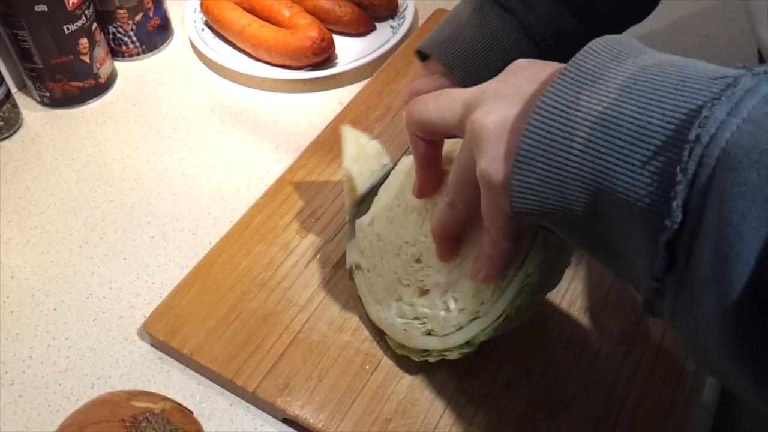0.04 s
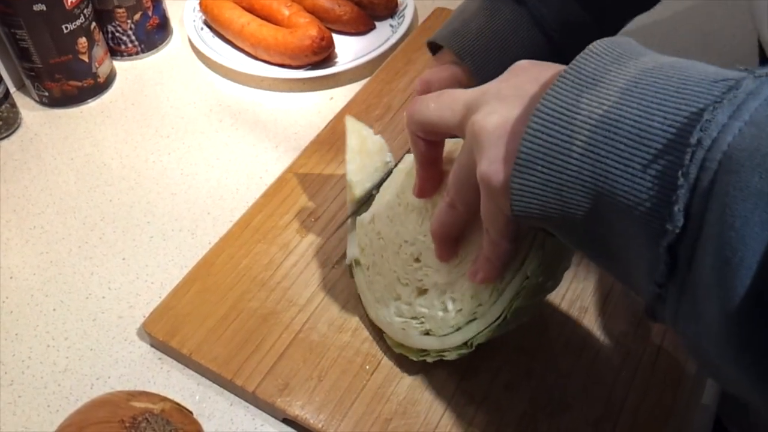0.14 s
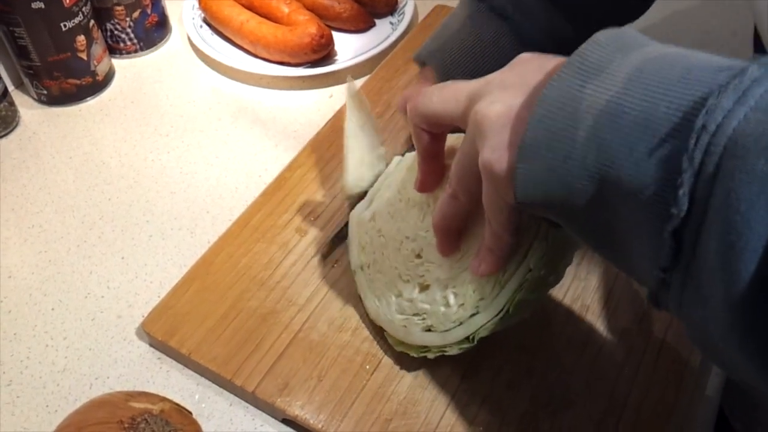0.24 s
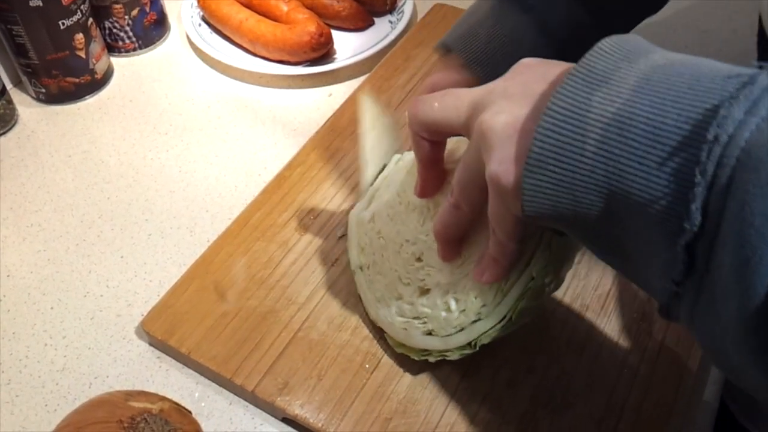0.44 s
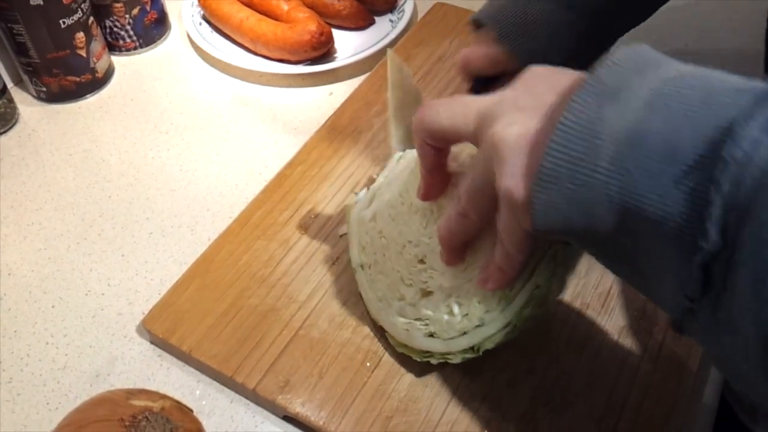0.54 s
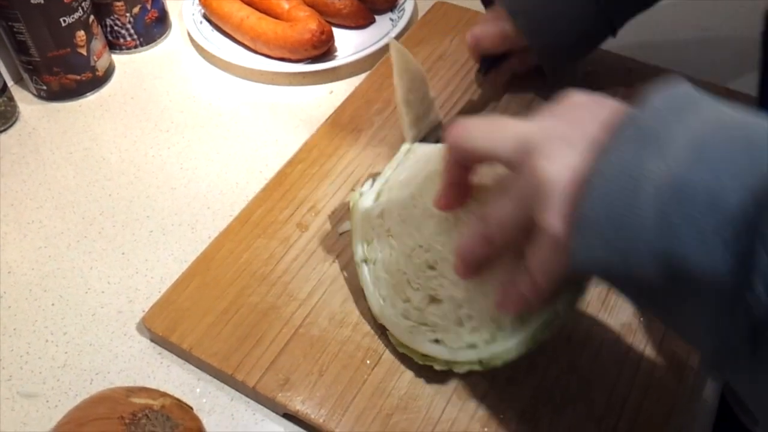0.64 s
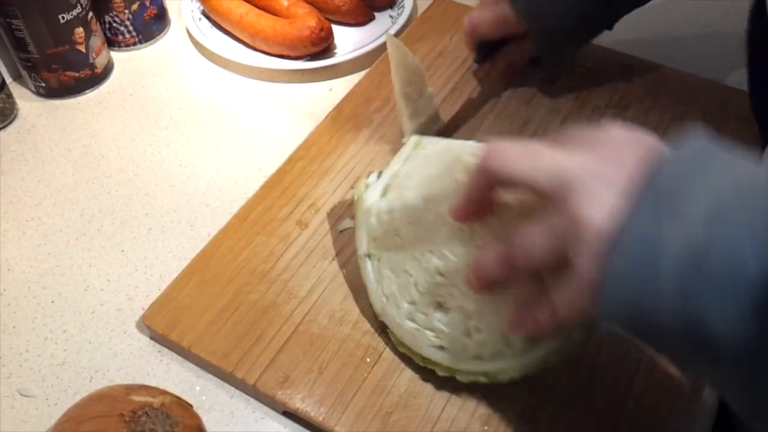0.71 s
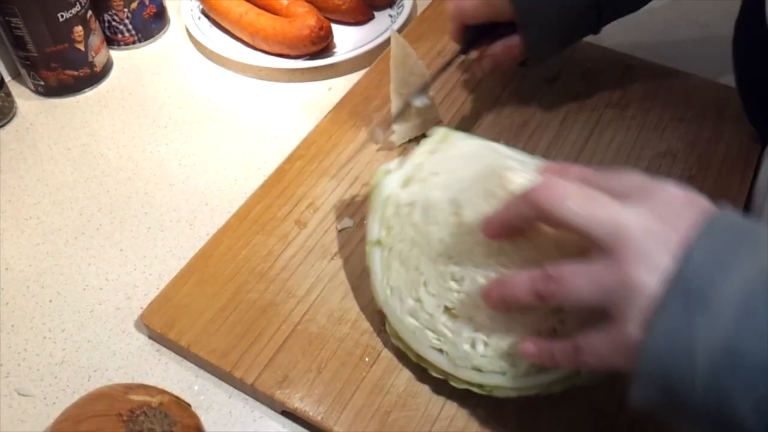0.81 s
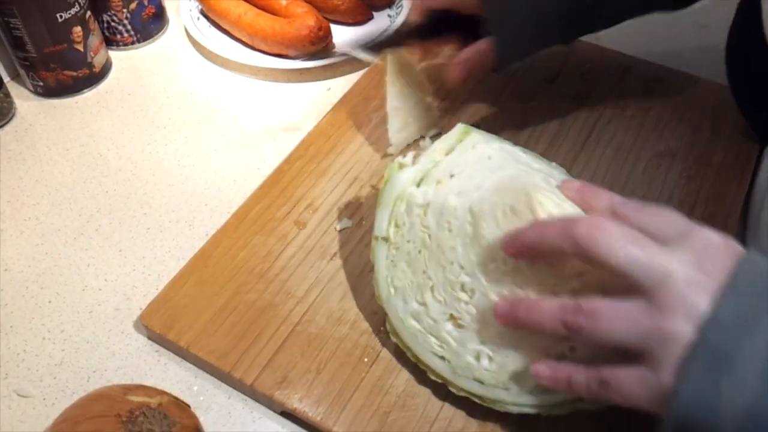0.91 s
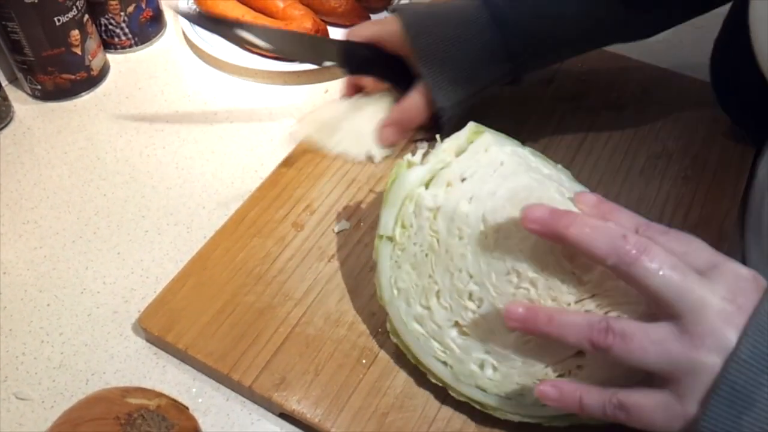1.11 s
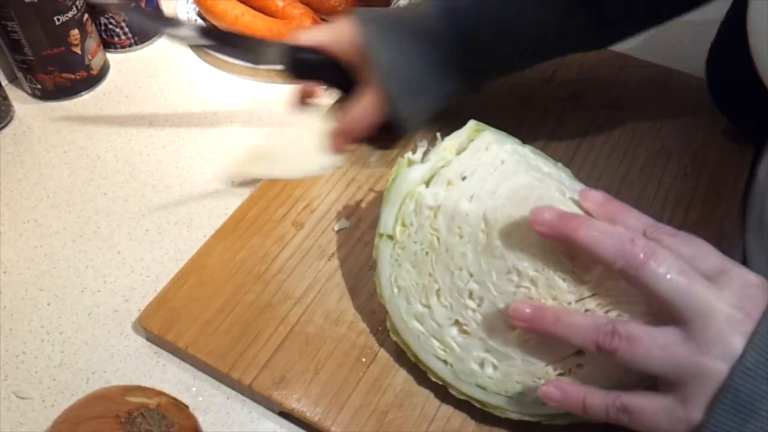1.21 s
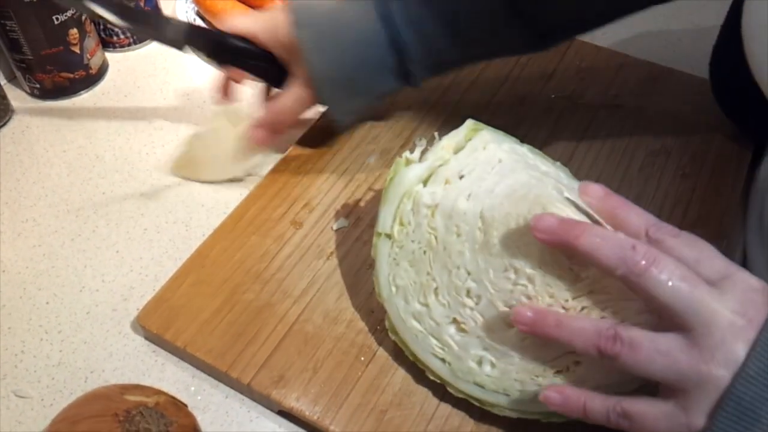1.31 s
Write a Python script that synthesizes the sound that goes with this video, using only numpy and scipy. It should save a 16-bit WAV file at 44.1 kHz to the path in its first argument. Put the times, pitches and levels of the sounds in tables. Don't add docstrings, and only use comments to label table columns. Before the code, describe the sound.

A knife chops hard through a crunchy raw cabbage core and hits a wooden board, close up.

```python
import sys
import numpy as np
from scipy import signal
from scipy.fft import rfft, irfft
from scipy.io import wavfile
from scipy.ndimage import map_coordinates

SR = 44100
rng = np.random.default_rng(int(sys.argv[2]) if len(sys.argv) > 2 else 0)


def pcm_store(signal):
    levels = np.round(np.clip(np.atleast_2d(signal), -1, 1) * 32767)
    wavfile.write(sys.argv[1], SR, levels.astype(np.int16).T)


def nominal_scale(level):
    x = np.asarray(level, float) / 20
    return 10 ** x


N = 59535


def rms_one(x):
    return x / np.sqrt(np.mean(x ** 2) + 1e-20)


def in_time(rows):
    s, db = np.transpose(rows)
    return np.interp(np.arange(N) / SR, s, db)


def colour(x, points, share=1):
    size = 2 ** 17
    hz, db = np.transpose(points)
    bins_hz = np.arange(size // 2 + 1) * SR / size
    gain_db = share * np.interp(np.log(bins_hz + 1), np.log(hz + 1), db)
    cepstrum = irfft(gain_db * np.log(10) / 20)
    cepstrum = np.concatenate([cepstrum[:1], 2 * cepstrum[1:size // 2]])
    return irfft(rfft(x, size) * np.exp(rfft(cepstrum, size)))[..., :N]


def drift(rate_hz):
    r = np.exp(-2 * np.pi * rate_hz / SR)
    return rms_one(signal.lfilter([1], [1, -2 * r, r * r], rng.standard_normal(N + SR))[SR:])


def ring(x, hz, t60):
    r, w = nominal_scale(-60 / (t60 * SR)), 2 * np.pi * hz / SR
    return signal.lfilter([0, np.sin(w)], [1, -2 * r * np.cos(w), r * r], x + 1e-18)


def pair(two, alike):
    alike = np.clip(alike, 0, 1)
    side = signal.sosfilt(signal.butter(1, 320, "high", fs=SR, output="sos"), two[1])
    shared = np.sqrt(1 + alike) * two[0]
    opposed = np.sqrt(1 - alike) * side * np.array([[1], [-1]])
    return (shared + opposed) / np.sqrt(2)


def grains(per_s, spread_db, spectrum, alike):
    sizes = nominal_scale(spread_db * np.minimum(rng.exponential(1, (2, N)), 5)) * rng.standard_normal((2, N))
    born = np.clip((per_s / SR - rng.random((2, N))) * 20, 0, 1)
    return rms_one(colour(pair(sizes * born, alike), spectrum))


def struck(blows, modes, scatter_db):
    out, own = np.zeros(N), rng.standard_normal((len(blows), len(modes)))
    for k, (hz, db, t60) in enumerate(modes):
        clicks = np.zeros(N)
        for j, (s, blow_db) in enumerate(blows):
            clicks[int(s * SR)] = nominal_scale(blow_db + db + scatter_db * own[j, k]) * (-1) ** k
        out += ring(clicks, hz, t60)
    return out


# frequency in Hz, density in dB per Hz.
AIR_COLOUR = [(30, -43.5), (158, 0.5), (500, -15), (655, -8.5), (1400, -22), (7500, -24), (13800, -32.5),
              (15000, -56)]
# frequency in Hz, level in dB, line width in Hz.
HUM_LINES = [(124.7, -60.5, 4.7), (175, -55, 16), (244.3, -58, 6.5), (308.3, -59, 23), (634, -60, 34),
             (761, -68, 24)]


def room_tone():
    out = nominal_scale(-48.5) * rms_one(colour(pair(rng.standard_normal((2, N)), alike=0.25), AIR_COLOUR))
    for hz, db, width_hz in HUM_LINES:
        line = ring(rng.standard_normal((2, N + SR)), hz, 4.1 / width_hz)[:, SR:]
        out = out + nominal_scale(db) * rms_one(pair(line, alike=1))
    return out


# time in seconds, level in dB.
RUB_LEVEL = [(0, -27.5), (.025, -34.5), (.06, -40), (.13, -43), (.19, -53.5), (.36, -42), (.43, -43),
             (.465, -36.5), (.5, -38), (.55, -33), (.6, -42.5), (.68, -45.5), (.84, -53.5), (.857, -36.5),
             (.895, -60), (.915, -39.5), (.97, -57), (1.35, -57)]
# frequency in Hz, density in dB per Hz.
RUB_COLOUR = [(300, -1), (900, 1), (2000, 1), (3700, 4.5), (5400, -1), (7500, 2), (13000, -12),
              (15000, -23)]


def rubbing():
    level_db = in_time(RUB_LEVEL) + 1.0 * drift(rate_hz=60)
    return nominal_scale(level_db) * grains(per_s=15000, spread_db=1.8, spectrum=RUB_COLOUR, alike=0.13)


SNAP_TIMES = [.0075, .016, .0682, .171, .464, .5188, .533, .547, .551, .568, .605, .689, .718, .762, .776,
              .8103, .8248, .8538, .858, .869, .877, .9028, .9103, .93, .943, .976, 1.03, 1.106, 1.247]
# peak in dB, pitch in Hz, length in seconds.
SNAPS = [(-24, 2800, 0.004), (-22, 3400, .005), (-19, 8000, .005), (-35, 3400, 0.0026), (-26, 5000, 0.0038),
         (-24, 3400, 0.00074), (-25, 2400, 0.0063), (-22, 2400, .002), (-23.5, 2000, 0.008),
         (-29.5, 2400, 0.0013), (-34, 9800, 0.0096), (-27.5, 4000, 0.0028), (-27, 4100, 0.0045),
         (-36, 5500, .002), (-34, 2200, 0.0029), (-24.5, 6800, 0.0016), (-19, 9600, 0.0025),
         (-27.5, 7400, 0.0052), (-27.5, 3300, 0.0044), (-37, 9500, 0.0016), (-39, 7200, .002),
         (-19.5, 4900, 0.00099), (-24, 5400, 0.0059), (-44, 5600, .002), (-49, 6000, 0.0018),
         (-33, 3400, 0.0027), (-39, 1660, 0.0092), (-26.5, 2740, 0.0037), (-31.5, 7500, 0.0078)]
# frequency in Hz, density in dB per Hz.
SNAP_COLOUR = [(500, -49), (1500, -8), (3750, -40), (5300, 7), (7500, 4), (14800, -13)]


def snaps():
    trim_db, broad_db, ring_cycles = -1, 6.5, 7
    broad, tuned, t = np.zeros(N + SR), np.zeros(N + SR), np.arange(1500) / SR
    noise = rng.standard_normal((len(SNAPS), len(t)))
    noise[:, 0] = 3
    for s, (db, hz, length_s), crackle in zip(SNAP_TIMES, SNAPS, noise):
        burst = crackle * np.exp(-t / (abs(length_s) / 2))
        tone = ring(burst, hz, ring_cycles / hz)
        i = int(s * SR)
        tuned[i:i + len(t)] += nominal_scale(db + trim_db) * tone / np.abs(tone).max()
        broad[i:i + len(t)] += nominal_scale(db + trim_db + broad_db) * burst / np.abs(burst).max()
    return tuned[:N] + colour(broad[:N], SNAP_COLOUR)


# time in seconds, level in dB.
TEAR_LEVEL = [
    (.2035, -33),
    (.2056, -40),
    (.2062, -16.5),
    (.217, -16.5),
    (.225, -16),
    (.232, -13),
    (.244, -20),
    (.256, -31.5),
    (.33, -59),
]
# frequency in Hz, density in dB per Hz.
TEAR_COLOUR = [(120, -28), (900, -2.5), (2000, 2.5), (3800, 1.5), (5300, 0.5), (7500, 3), (11000, -1.5),
               (14800, -8)]


def tearing():
    t = np.arange(N) / SR
    during = (t > TEAR_LEVEL[0][0]) * (t < TEAR_LEVEL[-1][0])
    cells = grains(per_s=14300, spread_db=2, spectrum=TEAR_COLOUR, alike=0.2)
    return nominal_scale(in_time(TEAR_LEVEL)) * during * cells


# time in seconds, level in dB.
LANDINGS = [
    (.2322, -6),
    (.2345, -11.5),
    (.2415, -14.5),
]
# frequency in Hz, level in dB, t60 in seconds.
BOARD_MODES = [(319, -15, 0.043), (510, -21.5, 0.1), (746, -14, 0.041), (920, -19, 0.045),
               (1090, -9.5, 0.017), (1460, -6.5, 0.017), (1586, -8, 0.035), (1877, -4.5, 0.086),
               (2040, -5, 0.013), (2793, -4, 0.04), (2920, -3.5, 0.013), (3810, 0.5, 0.012),
               (4470, -6, .01)]


def landing():
    return struck(LANDINGS, BOARD_MODES, scatter_db=2.5)


# frequency in Hz, density in dB per Hz.
SPLIT_COLOUR = [(100, -20), (300, -4.5), (900, -10), (1900, 5.5), (3000, -6.5), (5500, -20), (8000, -7),
                (14800, -27)]


def splitting():
    start_s, start_db, t60_s = .234, -16, 0.23
    t = np.arange(N) / SR
    level_db = start_db - 60 * np.abs(t - start_s) / t60_s
    cells = grains(per_s=7700, spread_db=2, spectrum=SPLIT_COLOUR, alike=0.2)
    return nominal_scale(level_db) * (t > start_s) * cells


# time in seconds, level in dB.
KNOCKS = [
    (1.1065, -27),
    (1.1145, -27),
    (1.141, -38),
    (1.162, -31),
    (1.19, -48.5),
]
# frequency in Hz, level in dB, t60 in seconds.
COUNTER_MODES = [(183, -12, .1), (280.3, -5, 0.25), (360, -8.5, 0.034), (420, -8, 0.14), (464, -6, 0.046),
                 (536.5, -13, 0.23), (596, -3, 0.033), (748.5, -13.5, 0.094), (828, -22, 0.045),
                 (980, -9.5, 0.027), (1420, -10, 0.016), (2330, -17, .015)]


def knocking():
    return struck(KNOCKS, COUNTER_MODES, scatter_db=4.5)


def kitchen(x):
    t60_s, wall_cut_hz = 0.35, 3800
    t = np.arange(SR // 2) / SR
    echoes = pair(rng.standard_normal((2, len(t))), alike=0) * nominal_scale(-60 * t / t60_s) * (t > .004)
    echoes = signal.sosfilt(signal.butter(1, wall_cut_hz, fs=SR, output="sos"), echoes)
    return signal.fftconvolve(x[None], echoes / np.sqrt(np.sum(echoes[0] ** 2)), axes=1)[:, :N]


# frequency in Hz, left minus right in dB.
PORT_COLOUR = [(100, -10.5), (400, 0), (1000, -5), (2400, 2), (4500, 2.5), (8000, -6.5), (14800, -3.5)]


def ports(near, lag_s):
    left = colour(near[0], PORT_COLOUR, share=0.82)
    left = map_coordinates(left, [np.arange(N) - lag_s * SR])
    return np.array([left, colour(near[1], PORT_COLOUR, share=-0.46)])


def scene():
    chop = tearing() + splitting() + landing()
    handling = rubbing() + snaps() + knocking()
    direct = ports(chop, lag_s=0.00024) + ports(handling, lag_s=.00007)
    echoes = nominal_scale(-13.5) * kitchen((chop + handling).mean(axis=0))
    return direct + echoes + room_tone()


def low_pass(x):
    return signal.sosfilt(signal.butter(12, 15360, fs=SR, output="sos"), x)


def record(dry):
    heard = signal.sosfilt(signal.cheby2(10, 50, 15500, fs=SR, output="sos"), dry)
    heard = signal.sosfilt(signal.butter(2, 103, "high", fs=SR, output="sos"), heard)
    overloaded = np.clip(heard, -1.0, 1.0)
    return low_pass(overloaded)


dry = scene()
out = record(dry)
pcm_store(out)
```